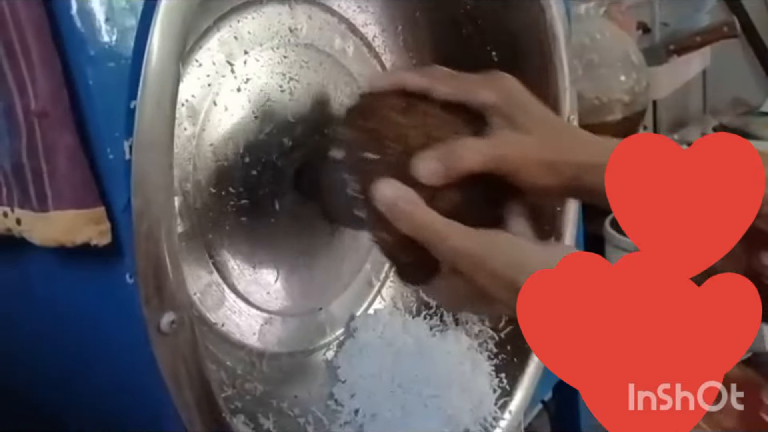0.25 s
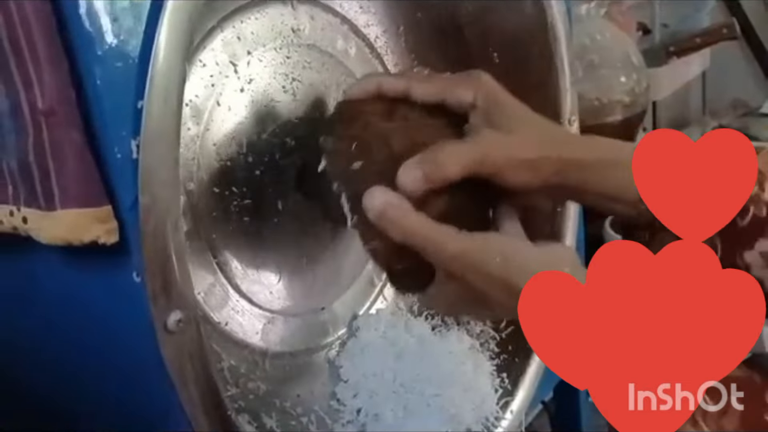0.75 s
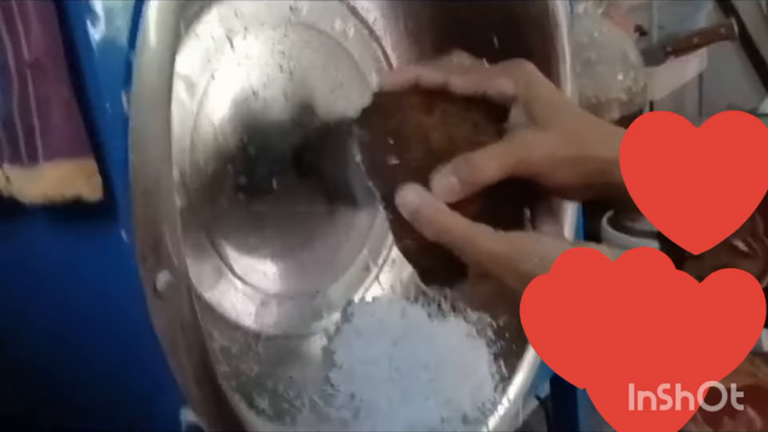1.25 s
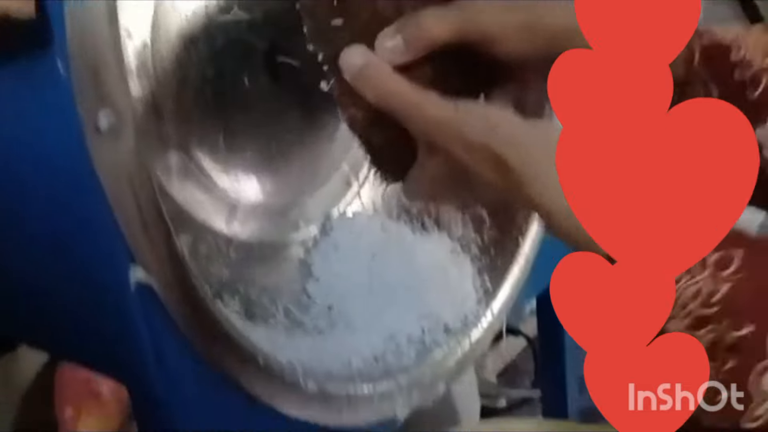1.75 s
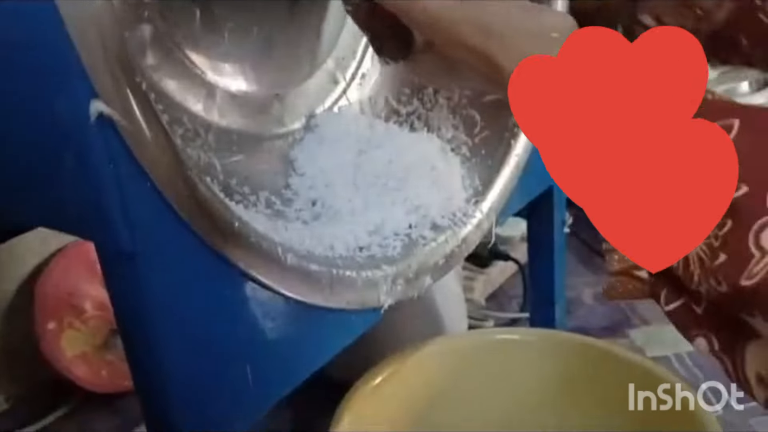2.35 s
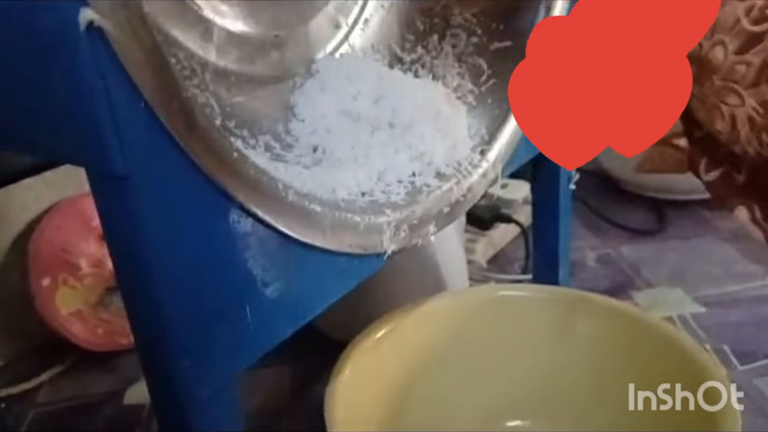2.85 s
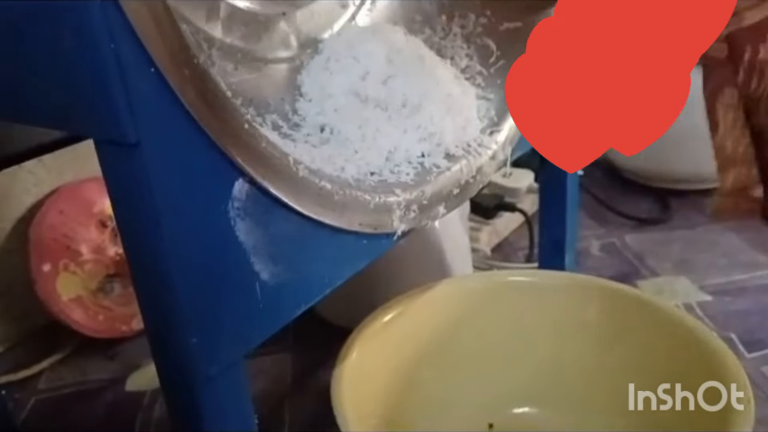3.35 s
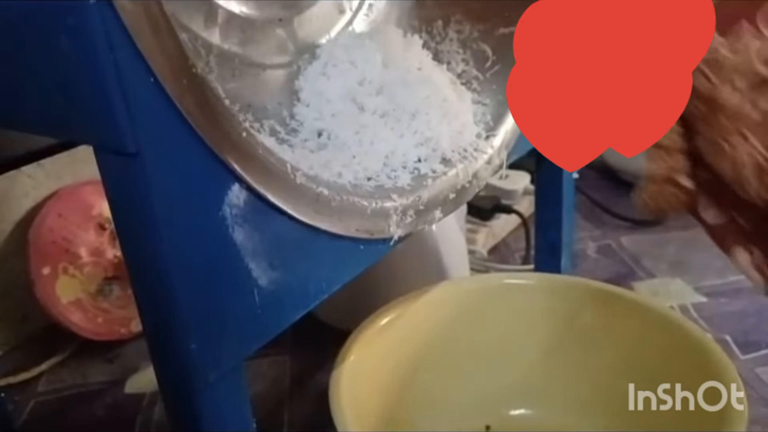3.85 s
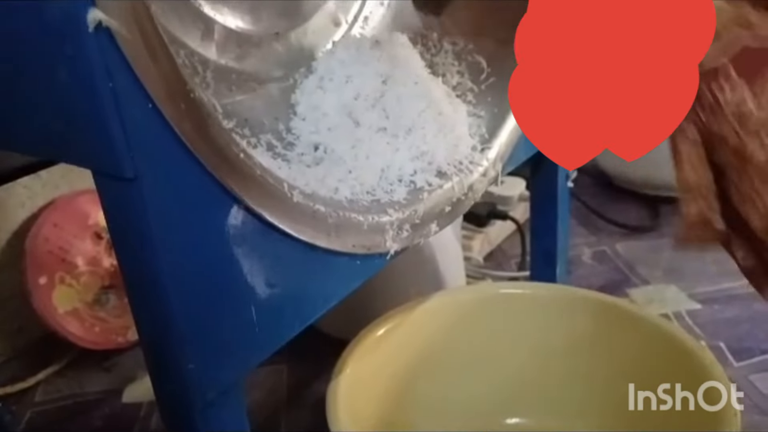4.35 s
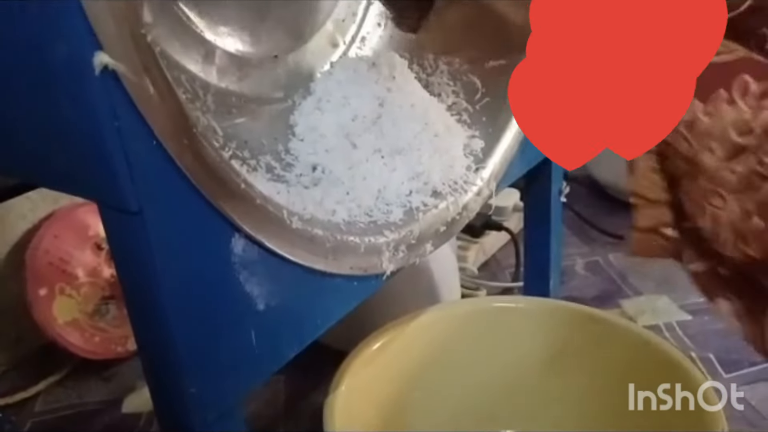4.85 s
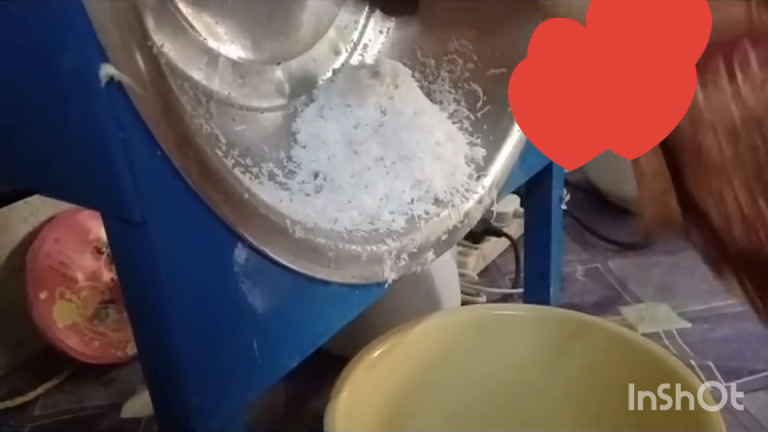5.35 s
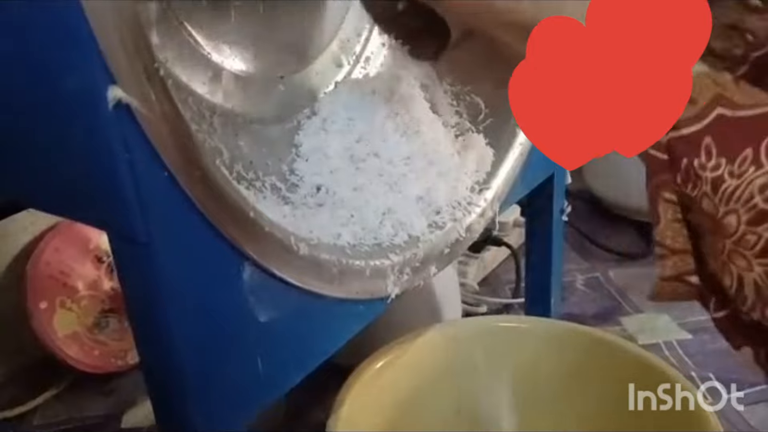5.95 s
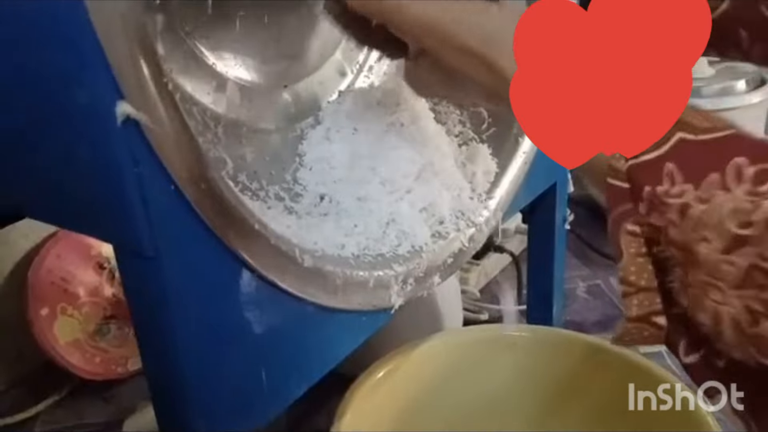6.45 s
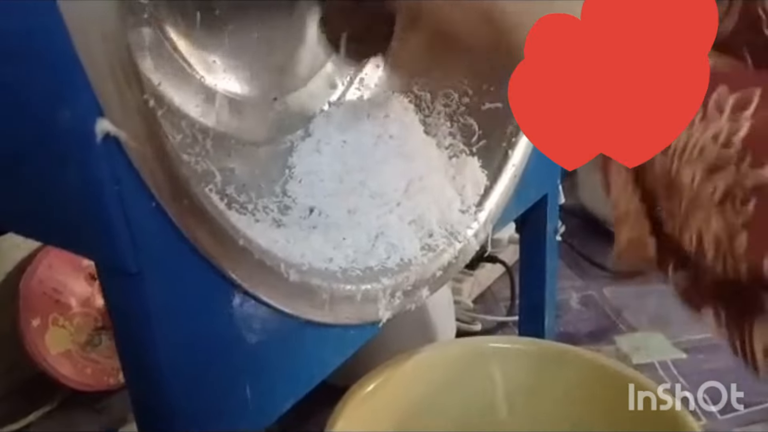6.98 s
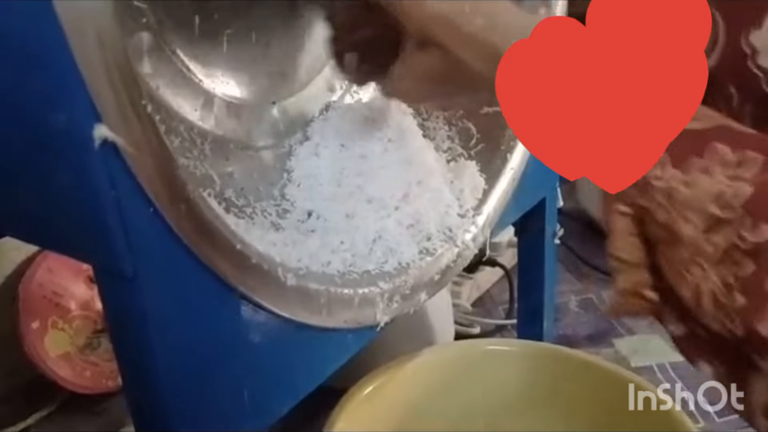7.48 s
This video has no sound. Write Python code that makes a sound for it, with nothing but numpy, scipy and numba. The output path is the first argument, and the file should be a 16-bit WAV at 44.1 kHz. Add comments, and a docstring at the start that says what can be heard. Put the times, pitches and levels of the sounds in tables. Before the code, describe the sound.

A close, slightly wide kitchen sound of about 7.7 seconds. An electric grater runs constantly: low mains-like hum, buzzing stand drone, and a rattling steel bowl that wavers and swells irregularly. From the start, coconut is rasped on the spinning teeth, wet fibres hissing brightly while the hollow shell adds a gritty, nasal tone fluttering quickly with each turn. Short pushes surge at about 0.1, 0.45, 0.9, 1.2, 1.55, 1.85 and 2.2 seconds, the strongest between 1.2 and 2. Grating eases around 2.7, bites again near 3, with a sharp chip flick at 3.6, then stays fairly even and lighter. From 4.7 to 5.1 teeth chatter harshly in quick scrapes on hard shell. Brighter fresh bites follow at 5.3, 5.8 and 6.2, with small chips. Clear dips come around 7.0 and 7.4, each followed by a renewed hissing surge; a low thrum swells near 7.2. The motor is still running at the end.

```python
"""Electric coconut grater in a kitchen

A motor heard close up hums, whines and shakes its stand and steel bowl: shaft harmonics plus noise-driven modes.
A coconut half rocks on the toothed head: snapping wet fibres hiss, coarser tears drive the hollow shell's air modes.
Pushes raise and shift the rasp; lifts dip both, then surge on fresh flesh.
Chips fly off as short pitched noise; now and then the teeth scrape hard shell in brief chatters.
"""
import sys
import numpy as np
from scipy import signal
from scipy.fft import rfft, irfft
from scipy.io import wavfile
from scipy.ndimage import uniform_filter1d
from numba import njit

SR = 44100
rng = np.random.default_rng(int(sys.argv[2]) if len(sys.argv) > 2 else 0)


def master_out(mix):
    """Clip the mix to full scale and print it as 16-bit PCM to the path in sys.argv[1]."""
    frames = np.transpose(np.atleast_2d(mix))
    ceiling = np.clip(frames, -1, 1)
    pcm = np.round(ceiling * 32767).astype(np.int16)
    wavfile.write(sys.argv[1], SR, pcm)


N = 340452
T = np.arange(N) / SR  # time, s
BINS = np.fft.rfftfreq(N, 1 / SR)  # frequency, Hz

# Stand drone: [t/s, level/dB before trim]
DRONE_LEVEL = [(0.0, -28.5), (0.51, -29), (0.65, -20), (0.77, -26.5), (2.66, -24), (2.94, -32), (3.03, -17),
               (3.15, -34), (3.3, -17), (3.56, -27), (4.72, -28.5), (4.82, -16.5), (4.91, -28.5),
               (5.11, -19.5), (5.23, -26.5), (5.88, -33), (5.97, -20.5), (6.15, -33.5), (6.29, -24),
               (6.69, -20.5), (6.86, -28.5), (7.72, -23.5)]
# Bowl low rattle: [t/s, level/dB before trim]
RATTLE_LEVEL = [(1.31, -31.5), (1.66, -21), (1.81, -32.5), (1.94, -22.5), (2.17, -28.5), (2.61, -21.5),
                (2.73, -32), (3.54, -26), (4.1, -27.5), (4.55, -24), (4.8, -24), (5.7, -36), (6.21, -26.5),
                (7.72, -28)]
DRONE_TRIM_DB, RATTLE_TRIM_DB = 0.5, -0.8
# Low thrum: [t/s, level/dB]
THRUM_LEVEL = [(0.6, -26.5), (1.45, -37), (3.7, -28), (4.3, -34), (6.8, -37), (7.2, -20.5), (7.7, -37)]
# Shaft harmonics in stand, bowl, motor: [multiple of shaft rate, relative level/dB]
STAND_HARMONICS = [(6, -10), (7, 33.5)]
BOWL_HARMONICS = [(10, -11.5), (11, -5)]
MOTOR_HARMONICS = [(5, -2.5), (30, -16), (34, -9.5), (38, -19)]
# Resonances of stand, bowl, motor frame and bowl steel: [f/Hz, nominal width/Hz, relative level/dB]
STAND_RESONANCES = [(149.2, 25.5, -14), (168.9, 6.7, -11.5)]
BOWL_RESONANCES = [(246.5, 33, 3), (264.9, 11.6, -1), (281.2, 12, 1.5), (312.7, 9, -8), (356.5, 13.5, -9)]
FRAME_RESONANCES = [(100.2, 7.1, -4), (123, 25.2, 0), (198.4, 52, -6), (716.6, 33, -17), (808, 36, -17),
                    (1096, 142, -25)]
STEEL_RESONANCES = [(1156, 47, 2), (2270, 220, -12), (2975, 83, 5), (4390, 52, -14)]
# Rumble spectrum: [f/Hz, relative level/dB]
RUMBLE_SPECTRUM = [(25, -31), (50, -8), (90, -25), (220, 16.5), (440, 3), (900, -1), (1450, -6.5),
                   (4000, -2.5), (9000, -16)]
# Machine at two microphone ports: [f/Hz, side minus mid/dB]
SIDE_SPECTRUM = [(130, -36), (350, -13), (600, -13), (1100, -2)]
# Steady light contact: [t/s, flesh level/dB before trim, shell rasp level/dB before trim]
CONTACT_LEVELS = [(0.0, -27.5, -30), (1.7, -29.5, -30.5), (3.3, -30.5, -27.5), (4.4, -30.5, -28),
                  (5.6, -29, -30.5), (7.7, -29, -29)]
FLESH_TRIM_DB, SHELL_TRIM_DB = 3.0, -3.5
# Hand eases off, then sets fresh flesh on the teeth:
# [start t/s, return t/s, seating time/s, dip/dB (negative = rise), fresh bite/dB]
HAND_LIFTS = [(0.0, 0.016, 0.01, -2, 4), (0.313, 0.386, 0.024, 4, 4), (0.683, 0.763, 0.018, 3.5, 4),
              (2.011, 2.08, 0.04, 5, 1.5), (2.686, 2.88, 0.049, 3, 1), (5.093, 5.286, 0.17, 3.5, 3),
              (5.703, 5.763, 0.0055, 4.5, 3), (6.014, 6.191, 0.06, 7.5, 3.5), (6.832, 7.036, 0.0088, 13, 4),
              (7.348, 7.46, 0.039, 11.5, 5.5)]
EASE_SHARE = 0.715  # part of a lift spent letting go
BITE_FADE_S, BITE_RASP_RATIO = 0.0913, 1.72  # 1/e fade; rasp dB per dB of hiss
# Microphone turns from the head down to the rim: [turn start t/s, turn end t/s]
MIC_TURN_S = [0.97, 2]
# Microphone nears the rim as the hand shifts: [t/s, bowl ring strength/ratio, cavity size/ratio]
MIC_POSE = [(1.5, 0.78, 1), (3.0, 0.9, 0.85)]
# Spectra of flesh facing the head, flesh at the rim, shell rasp: [f/Hz, relative level/dB]
FACING_FLESH_SPECTRUM = [(1700, -13.5), (2350, -2), (5200, 1.5), (6800, -0.5), (7700, -6.5), (9500, 0),
                         (11800, -0.5), (14500, -3.5)]
RIM_FLESH_SPECTRUM = [(600, -42), (1900, -9), (2800, -8.5), (4000, -1), (6500, -3), (7900, -11.5),
                      (10300, -2), (11900, 1), (15700, -8)]
SHELL_SPECTRUM = [(1400, -5), (2000, -1.5), (2600, 4), (5600, 3.5), (7700, -7.5), (12000, -38)]
# Air modes of the coconut half: [f/Hz at size 1, relative level/dB]
AIR_MODES = [(2330, 4.5), (2750, 7), (3600, -1), (4600, 0), (5400, -2)]
REST_HZ, RIM_HZ = 4080, 5060  # rasp focus: light contact, fresh bite at the rim
FOCUS_LOSS_DB = 17  # air-mode loss one octave off focus
GAP_DB, GAP_Q, GAP_WANDER_OCT = -3, 10, 0.07  # head-to-flesh gap; level relative to cavity
# Hand pushes: [start t/s, hold/s, rasp rise/dB, focus f/Hz at mid-hold]
HAND_PUSHES = [(0.118, 0.025, 8, 3150), (0.448, 0.1124, 8, 3560), (0.652, 0.014, 9, 2950),
               (0.864, 0.032, 8, 2970), (1.229, 0.035, 12, 3760), (1.554, 0.048, 13.5, 3600),
               (1.851, 0.055, 14.5, 3700), (2.157, 0.098, 10, 3220), (2.463, 0.14, 4, 4630),
               (2.917, 0.058, 7.5, 3600), (3.117, 0.022, 8.5, 3680), (3.232, 0.14, 5.5, 4600),
               (4.65, 0.064, 4, 3900), (5.36, 0.033, 6, 4670), (5.82, 0.051, 7, 4550),
               (5.969, 0.02, 11, 4300), (6.587, 0.1784, 5.5, 4640), (7.208, 0.15, 3.5, 4040),
               (7.603, 0.1, 3.5, 3980)]
PUSH_ATTACK_S, PUSH_RELEASE_S = 0.029, 0.0835
SINK_OCT_PER_S = 1.05  # focus falls as the head digs in
COVER_RATIO, SPILL_RATIO, SPILL_S = 0.16, 0.16, 0.019  # hiss dB per dB of push: muffled; loosened flesh
# Booms of the bowl wall: [t/s, rise/dB]
WALL_BOOMS = [(0.13, 10), (0.64, 5.5), (1.62, 6), (3.8, 10), (4.48, 11), (4.75, 8)]
BOOM_BASE_DB, BOOM_HALF_S = -41.5, 0.085  # level at mean load; centre to 1/e of the dB rise
# Flicked chips: [t/s, onset level/dB, f/Hz, 1/e decay/s]
SHELL_CHIPS = [(3.567, -10.5, 4080, 0.0026), (4.453, -18.5, 3900, 0.011), (5.768, -22, 4720, 0.016),
               (5.996, -19.5, 4400, 0.02), (6.246, -18, 4800, 0.014)]
CHIP_PASS_WIDTH_HZ = 1700  # each of two passes
# Teeth on hard shell: [t/s, length/s without edges, level/dB]
SHELL_SCRAPES = [(4.688, 0.031, -22.5), (4.734, 0.027, -19), (4.776, 0.021, -25), (4.954, 0.017, -19.5),
                 (4.981, 0.025, -15.5), (5.022, 0.033, -18.5), (5.075, 0.02, -19)]
# Scrape spectrum before the bowl rings: [f/Hz, relative level/dB]
SCRAPE_SPECTRUM = [(500, -0.5), (1120, -12), (1500, -7), (1950, -8.5), (2900, 5), (4500, 9.5), (6300, 2.5),
                   (7400, -20)]
SCRAPE_EDGE_S = 0.002
# Port colour: [f/Hz, left minus right/dB]
PORT_DIFFERENCE = [(200, 1), (380, -3), (700, -4.5), (1290, -4.5), (2380, 5), (4400, -2), (8120, 3.5),
                   (15000, 0)]
MAINS_HZ, TOP_HZ = 50, 15780


def undb(db):
    """Decibels to gain."""
    return 10 ** (np.asarray(db) / 20)


def unit(x):
    """Scale to rms 1."""
    return x / np.sqrt(np.mean(x ** 2))


def curves(table):
    """Table columns interpolated linearly in time."""
    s, *columns = np.transpose(table)
    return [np.interp(T, s, c) for c in columns]


def noise(channels=1):
    """White noise, one row per channel."""
    return rng.standard_normal((channels, N))


def walk(rate_hz):
    """Smooth random wander, rms 1, Gaussian low-pass."""
    return unit(irfft(rfft(noise()[0]) * np.exp(-(BINS / rate_hz) ** 2), N))


def lag(x, seconds):
    """One-pole smoothing."""
    pole = np.exp(-1 / (seconds * SR))
    return signal.lfilter([1 - pole], [1, -pole], x)


def colour(x, points):
    """Filter by a (Hz, dB) spectrum, interpolated in log frequency."""
    hz, db = np.transpose(points)
    gain = undb(np.interp(np.log(BINS + 1), np.log(hz), db))
    return irfft(rfft(x) * gain, N)


def resonance(hz, width_hz):
    """Response of one damped mode, gain 1 at centre."""
    return 1j * BINS * width_hz / (hz ** 2 - BINS ** 2 + 1j * BINS * width_hz)


@njit
def sweep(x, hz, q):
    """State-variable band-pass with a moving centre."""
    y, band, low = np.empty(len(x)), 0., 0.
    for i in range(len(x)):
        g = np.tan(np.pi * hz[i] / SR)
        v = (band + g * (x[i] - low)) / (1 + g * (g + 1 / q))
        band, low, y[i] = 2 * v - band, low + 2 * g * v, v / q
    return y


def tail(t60_s):
    """Dense exponentially dying reflections, energy 1."""
    t = T[:SR // 2]
    h = rng.standard_normal(len(t)) * np.exp(-np.log(1000) * t / t60_s)
    return h / np.sqrt(np.sum(h ** 2))


def ring(x, response):
    """Convolve with an impulse response."""
    return signal.fftconvolve(x, response)[:N]


def bursts(rate_hz, spread_db, decay_s):
    """Envelope of random unequal breaks: sudden onset, power decays exponentially."""
    breaks = (rng.random(N) < rate_hz / SR) * undb(spread_db * np.clip(noise()[0], -2, 2))
    return unit(np.sqrt(lag(breaks ** 2 + 1e-12, decay_s)))


def shaken(modes):
    """Randomly shaken modes; each acts twice, so the valleys between them stay dark."""
    spectrum = 0
    for hz, width_hz, db in modes:
        # widening offsets the narrowing of two passes
        spectrum = spectrum + undb(db) * rfft(noise()) * resonance(hz, 1.46 * width_hz) ** 2
    return unit(irfft(spectrum, N))


def even(x):
    """Hold a vibration at constant strength, leaving its quick flutter."""
    power = uniform_filter1d(uniform_filter1d(x ** 2, SR // 10), SR // 10)
    return x / np.sqrt(power + 1e-9)


def shaft_tones(turns, orders, waver_db, slip_rad):
    """Shaft harmonics; the uneven cut makes each waver in size and phase."""
    total = 0
    for k, db in orders:
        phase = 2 * np.pi * k * turns + slip_rad * walk(11.5)
        total = total + undb(db + waver_db * walk(12.7)) * np.sin(phase)
    return unit(total)


def steel_ring(x, points, ringing):
    """Source colour plus the steel bowl's modes ringing on."""
    modes = sum(undb(db) * resonance(hz, width_hz) for hz, width_hz, db in STEEL_RESONANCES)
    return unit(colour(x, points) + ringing * irfft(rfft(x) * modes, N))


def hum():
    """Magnetic pull at twice the mains frequency, wavering in level."""
    return undb(-32.5 + walk(4.4)) * np.sin(2 * np.pi * 2 * MAINS_HZ * T)


def whine(turns):
    """Motor tones locked to the shaft."""
    return undb(-37) * shaft_tones(turns, MOTOR_HARMONICS, waver_db=2.5, slip_rad=0.3)


def frame(load_db):
    """Motor modes shaken at random, slightly stronger under load."""
    return undb(-29.0 + 0.12 * load_db) * even(shaken(FRAME_RESONANCES))


def thrum():
    """One low mode shaken at random, swelling and fading."""
    return undb(curves(THRUM_LEVEL)[0]) * even(shaken([(117.7, 13.3, 0)]))


def stand(turns, level_db):
    """Stand drone: shaft tones plus randomly shaken modes."""
    tones = shaft_tones(turns, STAND_HARMONICS, waver_db=5.5, slip_rad=0.92)
    return undb(level_db) * even(tones + 0.48 * shaken(STAND_RESONANCES))


def bowl(turns, level_db):
    """Bowl rattle: shaft tones plus randomly shaken modes."""
    tones = shaft_tones(turns, BOWL_HARMONICS, waver_db=8.5, slip_rad=0.81)
    return undb(level_db) * even(tones + 0.83 * shaken(BOWL_RESONANCES))


def rumble(bowl_db, load_db):
    """Broad noise through the bowl, growing with load and rattle."""
    level_db = -36.0 + 0.37 * load_db + 0.64 * (bowl_db - np.mean(bowl_db)) + 2 * walk(33)
    return undb(level_db) * steel_ring(noise(), RUMBLE_SPECTRUM, ringing=0.1)


def machine(turns, load_db):
    """Sum of motor, stand and bowl vibrations."""
    stand_db = DRONE_TRIM_DB + curves(DRONE_LEVEL)[0]
    bowl_db = RATTLE_TRIM_DB + curves(RATTLE_LEVEL)[0]
    motor = hum() + whine(turns) + frame(load_db) + thrum()
    shaking = stand(turns, stand_db) + bowl(turns, bowl_db) + rumble(bowl_db, load_db)
    return motor + shaking + booms(turns, load_db)


def spread(x, t60_s):
    """Bass reaches both ports alike; higher tones gain a diffuse side signal."""
    side = ring(colour(x, SIDE_SPECTRUM)[0], tail(t60_s))
    return x + side * np.array([[1], [-1]])


def hand():
    """Hiss dB, rasp dB and rasp focus Hz: steady contact shaped by pushes and lifts."""
    flesh_db, shell_db = curves(CONTACT_LEVELS)
    push_db, octaves = pushes()
    dip_db, fresh_db = lifts()
    # the head is covered during a push; loosened flesh flies out just after
    push_hiss_db = SPILL_RATIO * lag(push_db, SPILL_S) - COVER_RATIO * push_db
    hiss_db = flesh_db - dip_db + fresh_db + push_hiss_db + 2.0 * walk(8.4)
    rasp_db = shell_db - dip_db + BITE_RASP_RATIO * fresh_db + push_db
    at_rim = np.tanh(fresh_db / 2)
    focus_hz = (REST_HZ * 2 ** octaves) ** (1 - at_rim) * RIM_HZ ** at_rim
    return hiss_db, rasp_db, focus_hz


def lifts():
    """Dip dB as the hand eases off; fading surge dB as teeth meet fresh flesh."""
    dip_db, fresh_db = 0, 0
    for start, back, seat, dip, fresh in HAND_LIFTS:
        eased = start + EASE_SHARE * (back - start)
        dip_db = dip_db + dip * np.interp(T, [start, eased, back, back + seat], [0, 1, 1, 0])
        seating = np.clip((T - back) / seat, 0, 1)
        fade = np.exp(-(np.maximum(T - back - seat, 0) / BITE_FADE_S) ** 2)
        fresh_db = fresh_db + fresh * seating * fade
    return dip_db, fresh_db


def bite(turns, once_db, twice_db, catch):
    """Off-centre head bites harder once and twice a turn; teeth catch and let go."""
    angle = 2 * np.pi * turns
    runout = undb(once_db * np.sin(angle) + twice_db * np.sin(2 * angle))
    return unit(runout * (3.0 + catch * bursts(rate_hz=130, spread_db=5.0, decay_s=0.012)))


def snaps(rate_hz, spread_db, decay_s, direct):
    """Random breaks as noise; part reaches both ports directly, the rest is scattered by the bowl."""
    return bursts(rate_hz, spread_db, decay_s) * unit(noise(channels=2) + direct * noise())


def hollow(x, size, focus_hz, q, leak):
    """Cavity modes shift as the half rocks, ringing most near the focus; the gap resonates at it."""
    cavity, power = 0, 0
    for hz, db in AIR_MODES:
        rocking, patchy_db = 2 ** (0.04 * walk(7)), 4 * walk(16)
        centre_hz = np.clip(hz * rocking / size, 1000, SR / 4)
        off_focus_db = FOCUS_LOSS_DB * np.log2(centre_hz / focus_hz) ** 2
        gain = undb(db + patchy_db - off_focus_db)
        cavity = cavity + gain * np.array([sweep(side, centre_hz, q) for side in x])
        power = power + gain ** 2
    gap_hz = focus_hz * 2 ** (GAP_WANDER_OCT * walk(19))
    gap = np.array([sweep(side, gap_hz, GAP_Q) for side in x])
    return unit(cavity / np.sqrt(power) + undb(GAP_DB) * gap + leak * x)


def grating(turns, flesh_db, shell_db, focus_hz):
    """Fine wet fibres hiss; coarser tears shake the hollow shell; both ring the bowl."""
    ringing, cavity_size = curves(MIC_POSE)
    ringing = ringing * undb(2 * walk(6.6))  # uneven as the contact shifts
    pressure = bite(turns, once_db=1.16, twice_db=0.5, catch=0.79)
    fibres = snaps(rate_hz=2100, spread_db=-2.5, decay_s=0.0026, direct=0.12) * pressure
    tears = snaps(rate_hz=1500, spread_db=-1.5, decay_s=0.002, direct=0.51) * pressure
    facing = np.interp(T, MIC_TURN_S, [1, 0])
    facing_flesh = unit(colour(fibres, FACING_FLESH_SPECTRUM))
    rim_flesh = steel_ring(fibres, RIM_FLESH_SPECTRUM, 0.5 * ringing)
    flesh = facing * facing_flesh + (1 - facing) * rim_flesh
    cavity = hollow(tears, cavity_size, focus_hz, q=16., leak=0.035)
    rasp = steel_ring(cavity, SHELL_SPECTRUM, ringing)
    return undb(flesh_db + FLESH_TRIM_DB) * flesh + undb(shell_db + SHELL_TRIM_DB) * rasp


def pushes():
    """Each push builds, holds and relaxes: extra pressure dB and focus shift in octaves."""
    push_db, octaves = 0, 0
    for s, hold, db, hz in HAND_PUSHES:
        corners_s = s + np.cumsum([0, PUSH_ATTACK_S, hold, PUSH_RELEASE_S])
        shape = np.interp(T, corners_s, [0, 1, 1, 0])
        sink = SINK_OCT_PER_S * (T - s - PUSH_ATTACK_S - hold / 2)
        push_db = push_db + db * shape
        octaves = octaves + (np.log2(hz / REST_HZ) - sink) * shape
    return push_db, octaves


def booms(turns, load_db):
    """Shaft harmonic 16 sings in the bowl wall, follows load and swells now and then."""
    swell_db = sum(db * np.exp(-((T - s) / BOOM_HALF_S) ** 2) for s, db in WALL_BOOMS)
    tone = shaft_tones(turns, [(16, 0)], waver_db=3.5, slip_rad=1.0)
    return undb(BOOM_BASE_DB + swell_db + 0.47 * load_db) * tone


def chips():
    """A tooth snags and flicks a chip off the shell: a short, pitched scratch."""
    grit = rfft(noise(channels=2))
    total = 0
    for s, db, hz, decay_s in SHELL_CHIPS:
        scratch = unit(irfft(grit * resonance(hz, CHIP_PASS_WIDTH_HZ) ** 2, N))
        envelope = (T >= s) * np.exp(-np.abs(T - s) / decay_s)
        total = total + undb(db) * envelope * scratch
    return total


def scrapes():
    """Teeth chatter over bare shell for part of a turn, ringing the bowl."""
    contact = 0
    for s, length, db in SHELL_SCRAPES:
        corners_s = [s - SCRAPE_EDGE_S, s, s + length, s + length + 2 * SCRAPE_EDGE_S]
        contact = contact + undb(db) * np.interp(T, corners_s, [0.022, 1.0, 0.95, 0.0018])
    chatter = snaps(rate_hz=1200, spread_db=-2.0, decay_s=0.0011, direct=0.86)
    return contact * steel_ring(chatter, SCRAPE_SPECTRUM, ringing=4.0)


def kitchen(x, t60_s, room_db):
    """Small-room reflections with little bass."""
    heard = colour(x, [(250, -20), (900, 0)])
    return x + undb(room_db) * np.array([ring(side, tail(t60_s)) for side in heard])


def scene():
    """One shaft drives hum-side tones and cutting; it slows a little under load."""
    flesh_db, shell_db, focus_hz = hand()
    load_db = shell_db - np.mean(shell_db)
    shaft_hz = 23.92 * (1 - 0.002992 * lag(load_db, 0.066) + 0.00209 * walk(4.02))
    turns = np.cumsum(shaft_hz) / SR
    motor = spread(machine(turns, load_db), t60_s=0.21)
    cutting = grating(turns, flesh_db, shell_db, focus_hz) + chips() + scrapes()
    return kitchen(motor + cutting, t60_s=0.06, room_db=-5.5)


def record(dry):
    """Ports colour the two channels differently; a steep low-pass cuts the top."""
    left = colour(dry[0], [(hz, db / 2) for hz, db in PORT_DIFFERENCE])
    right = colour(dry[1], [(hz, -db / 2) for hz, db in PORT_DIFFERENCE])
    low_pass = signal.ellip(12, 0.1, 80, TOP_HZ, fs=SR, output="sos")
    return signal.sosfilt(low_pass, np.array([left, right]))


dry = scene()
out = record(dry)
master_out(out)
```